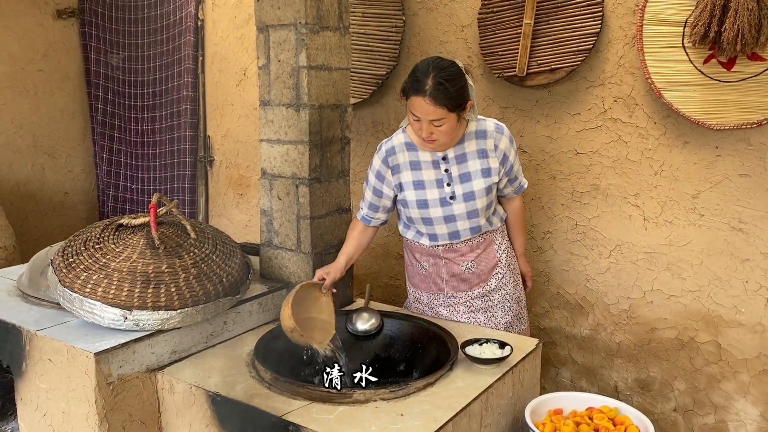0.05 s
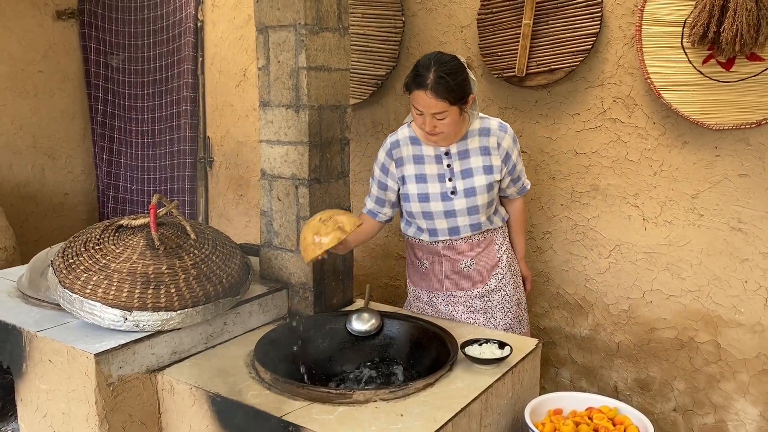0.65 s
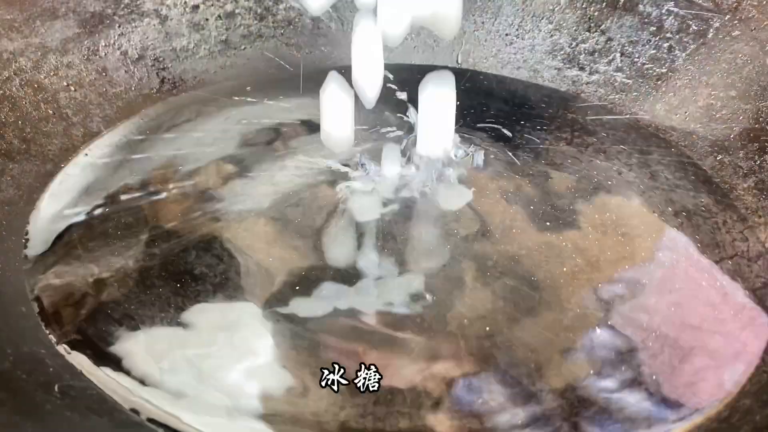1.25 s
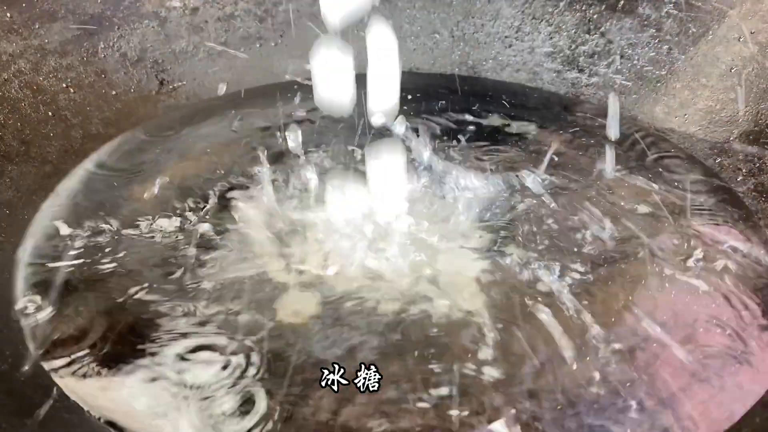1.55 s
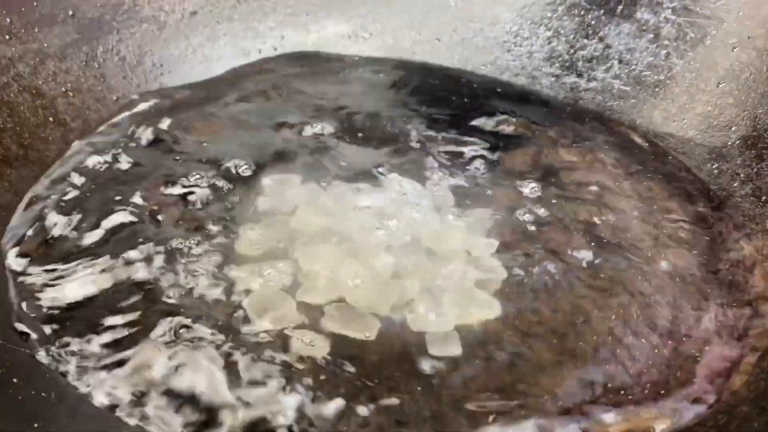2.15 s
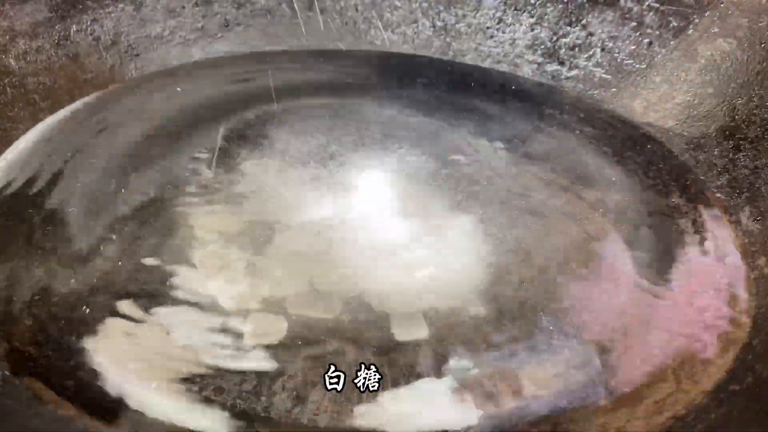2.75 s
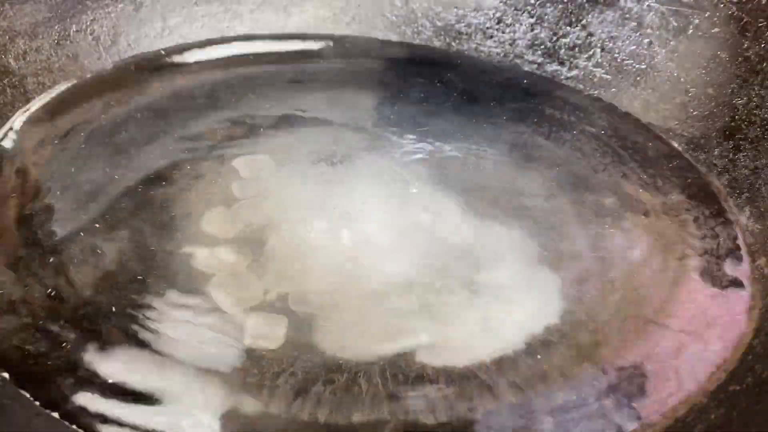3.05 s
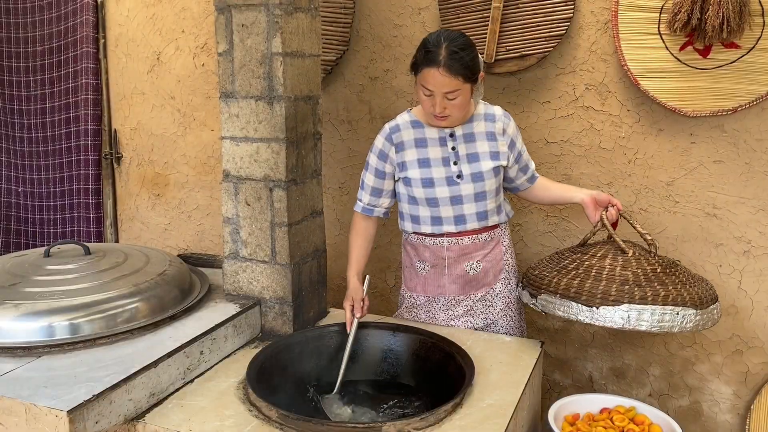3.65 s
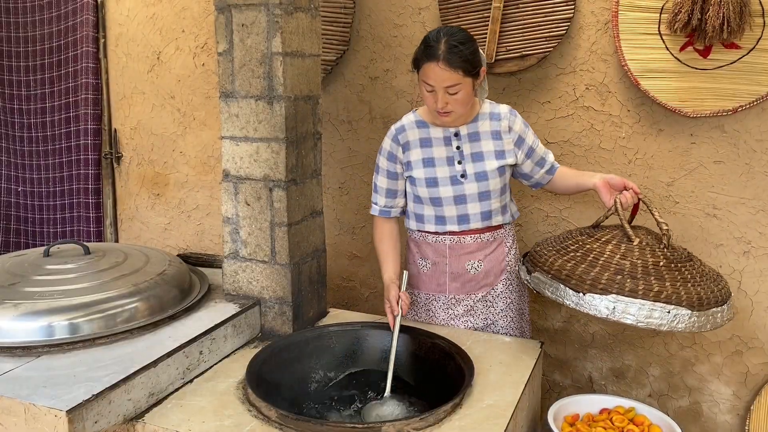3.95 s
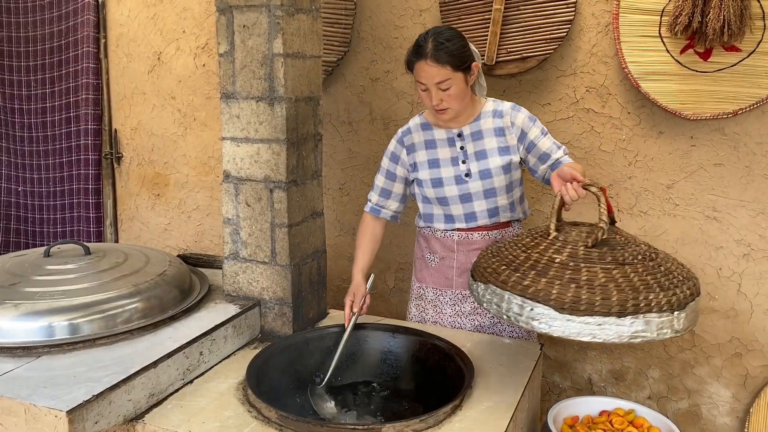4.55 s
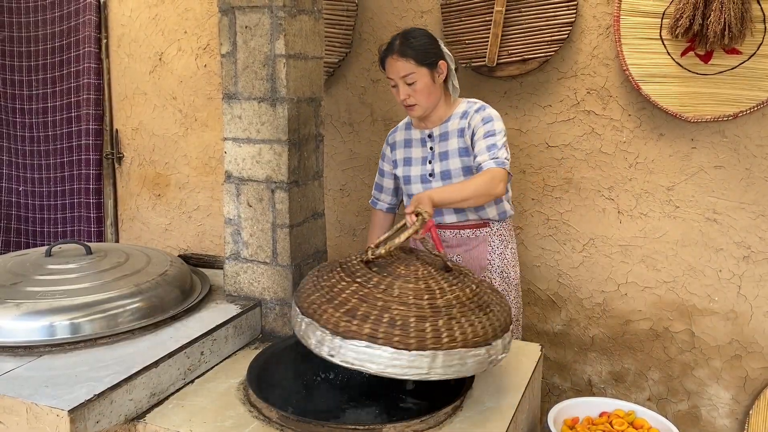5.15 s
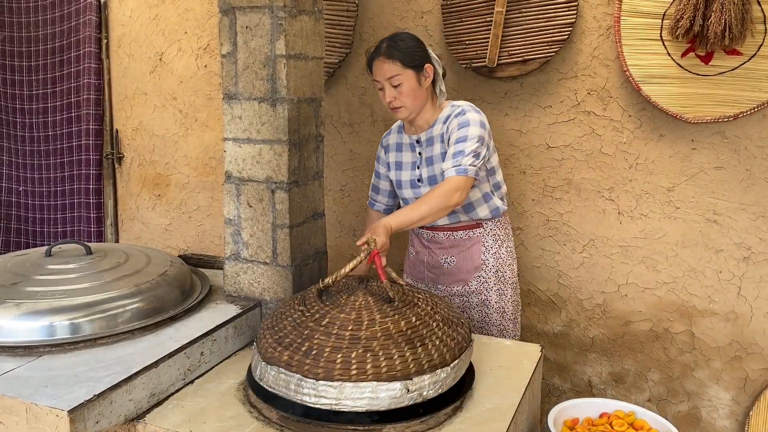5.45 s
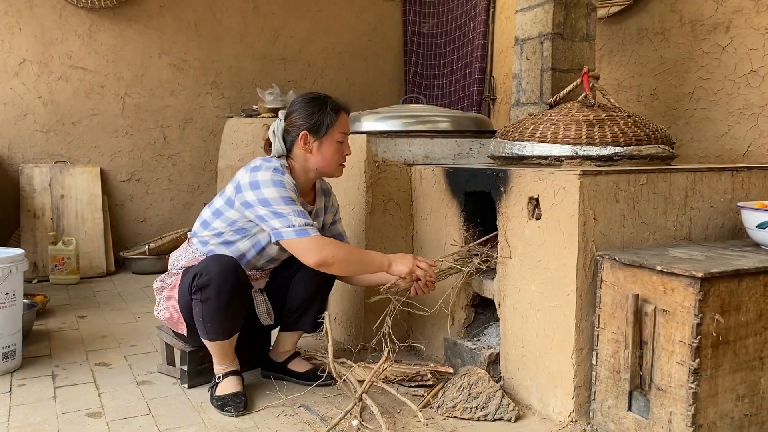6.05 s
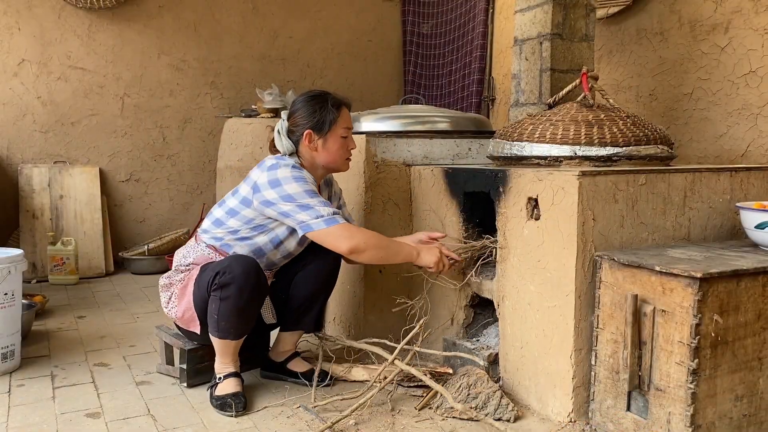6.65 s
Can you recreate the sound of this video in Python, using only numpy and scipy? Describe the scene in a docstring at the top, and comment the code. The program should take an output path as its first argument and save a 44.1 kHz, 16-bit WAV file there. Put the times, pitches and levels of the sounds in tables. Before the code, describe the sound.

Pouring water, a loud splashing clatter of rock sugar in a wok, ladle scrapes and knocks, a lid's clunk and soft twig snaps.

```python
"""Water pours into an iron wok on a clay stove in an open yard, fizzing with ringing bubbles. Lumps of
rock sugar clink out of a bowl, splash in and excite the modes of the iron; fine sugar hisses after them.
Birds call far off. A ladle scrapes, swirls and knocks, and a woven lid lands on the rim. The wok's
sounds stop abruptly, and dry twigs rustle and snap as they are shoved into the rumbling firebox.
Nearby walls reflect every sound, over a faint bed of open air."""
import sys
import numpy as np
from scipy import signal
from scipy.fft import rfft, irfft, next_fast_len
from scipy.io import wavfile
from scipy.ndimage import uniform_filter1d

SR = 44100
rng = np.random.default_rng(int(sys.argv[2]) if len(sys.argv) > 2 else 0)


def dump(signal):
    """Clip the signal to [-1, 1] and save it as 16-bit WAV at the path in sys.argv[1]."""
    limited = np.clip(np.atleast_2d(signal).T, -1, 1)
    pcm = np.round(limited * 32767).astype(np.int16)
    wavfile.write(sys.argv[1], SR, pcm)


N = 303834
T = np.arange(N) / SR


def amp(db):
    """Decibels to amplitude ratio."""
    return 10 ** (np.asarray(db) / 20)


def unit_rms(x):
    """Normalisation to unit power."""
    return x / np.sqrt(np.mean(x ** 2) + 1e-20)


def envelope(rows):
    """Smoothed gain along a level curve, silent outside its span."""
    time_s, level_db = np.transpose(rows)
    return uniform_filter1d(amp(np.interp(T, time_s, level_db, left=-150, right=-150)), size=200)


def swell(start_s, db, attack_s, hold_s, sag_db_per_s, fall_db_per_s):
    """Linear attack with two-stage exponential decay: a sag while held, then a fall."""
    t = T - start_s
    loss_db = sag_db_per_s * np.clip(t, 0, hold_s) + fall_db_per_s * np.maximum(t - hold_s, 0)
    return np.clip(t / attack_s, 0, 1) * amp(np.maximum(db - loss_db, -200))


def drift(rate_hz):
    """Random modulation with a spread of about 1."""
    knots = rng.standard_normal(4000)
    return np.interp(T * rate_hz, np.arange(len(knots)), knots)


def at_hz(points, hz):
    """Interpolation on a log-frequency axis."""
    frequency_hz, value = np.transpose(points)
    return np.interp(np.log(hz + 1), np.log(frequency_hz), value)


def tint(x, spectrum):
    """Zero-phase spectral shaping, rolling off below the first point."""
    size = next_fast_len(len(x))
    hz = np.arange(size // 2 + 1) * SR / size
    gain = amp(at_hz(spectrum, hz)) * np.minimum(hz / spectrum[0][0], 1) ** 2
    return irfft(rfft(x, size) * gain, size)[:len(x)]


def noise(spectrum, samples=N):
    """Filtered Gaussian noise of unit power."""
    return unit_rms(tint(rng.standard_normal(samples), spectrum))


def fade(t, t60):
    """Free decay: 60 dB lost in t60 seconds."""
    return np.exp(-np.log(1000) * t / t60)


def ring(clicks, hz, t60):
    """Damped resonator: each impulse starts a decaying sine."""
    radius, angle = fade(1 / SR, t60), 2 * np.pi * hz / SR
    return signal.lfilter([0, np.sin(angle)], [1, -2 * radius * np.cos(angle), radius ** 2], clicks + 1e-18)


def grains(per_s, spread_db):
    """Shot noise: tiny impacts at random times, uneven in size."""
    sizes = amp(spread_db * np.minimum(rng.exponential(1, N), 4)) * rng.choice([-1, 1], N)
    return unit_rms(sizes * (rng.random(N) < per_s / SR))


def bubble_cloud(spectrum, per_s, spread_db, cycles, patchy_db):
    """Bubble resonance: many small bubbles ring briefly, like sizes coming in clusters."""
    pitches_hz = np.geomspace(350, 15000, 36)
    births = grains(per_s, spread_db)
    birth_hz = pitches_hz[rng.integers(0, len(pitches_hz), N)]
    rings = np.zeros(N)
    for family in np.array_split(pitches_hz, 12):
        cluster = amp(patchy_db * drift(rate_hz=30))
        for hz in family:
            rings += cluster * np.sqrt(hz) * unit_rms(ring(births * (birth_hz == hz), hz, cycles / hz))
    mist = amp(-4.5) * rng.standard_normal(N)   # the finest droplets merge into a hiss
    return unit_rms(tint(unit_rms(rings) + mist, spectrum))


def plops(pockets):
    """Air pockets resonate, rising in pitch as they near the surface."""
    out, t = np.zeros(N), T[:SR // 3]
    for start_s, db, hz, t60, octaves_per_s in pockets:
        start = round(start_s * SR)
        onset = 1 - np.exp(-(t * hz) ** 2)   # builds over about one cycle
        phase = 2 * np.pi * np.cumsum(hz * 2 ** (octaves_per_s * t)) / SR
        out[start:start + len(t)] += amp(db) * onset * fade(t, t60) * np.sin(phase)
    return out


def gurgle(start_s, end_s, low_hz, high_hz, cycles, count):
    """Separate bubbles of equal Q: the small, high ones die sooner."""
    when, smallness, weakness, rise = rng.random((count, 4)).T
    hz = low_hz * (high_hz / low_hz) ** smallness
    return plops(zip(start_s + when * (end_s - start_s), -9 * weakness, hz, cycles / hz, 6 * rise))


# spectrum of the wok's bottom: frequency_hz, level_db
BOOM_SPECTRUM = [(55, -46), (100, -19), (160, -5), (205, 4), (290, -2.5), (370, -16), (480, -32.5),
                 (700, -43.5), (1000, -53.5)]


def judder():
    """Forced vibration of the water-loaded bottom around its lowest mode, at a steady level."""
    slips = grains(per_s=620, spread_db=2)
    lowest_mode = unit_rms(ring(slips, hz=213.5, t60=0.14))
    shake = unit_rms(unit_rms(tint(slips, BOOM_SPECTRUM)) + amp(-2) * lowest_mode)
    return shake / np.sqrt(uniform_filter1d(shake ** 2, size=2500) + 1e-3)


# flow from the scoop: time_s, level_db
POUR_FLOW = [(0.0, -40), (0.108, -43.5), (0.372, -37.5), (0.416, -42.5), (0.46, -37.5), (0.676, -42.5),
             (0.728, -38), (0.844, -54.5), (1.06, -62)]
# the stream straying onto bare iron: start_s, level_db
SPATTERS = [(.45, -52), (0.687, -41.5)]
# spectra of stream and spatter: frequency_hz, level_db
POUR_SPECTRUM = [(350, -7.5), (600, -8.5), (900, -1.5), (2200, -0.5), (4000, -5.5), (7000, -13.5),
                 (11000, -16), (15000, -25)]
SPATTER_SPECTRUM = [(2000, -17.5), (6500, 0.5), (11000, -6.5), (15000, -15.5)]


def pour():
    """Air entrainment: the stream fizzes and gurgles; it also spatters and sets the wok droning."""
    fizz = amp(-1) * bubble_cloud(POUR_SPECTRUM, per_s=9000, spread_db=1.5, cycles=14, patchy_db=5)
    bubbles = amp(1.5) * gurgle(0, 0.79, low_hz=560, high_hz=2840, cycles=44, count=200)
    drone = amp(-22.5) * judder()
    straying = sum(swell(s, db, attack_s=0.0039, hold_s=0.015, sag_db_per_s=63, fall_db_per_s=169)
                   for s, db in SPATTERS)
    spatter = unit_rms(tint(grains(per_s=6100, spread_db=3), SPATTER_SPECTRUM))
    return envelope(POUR_FLOW) * (fizz + bubbles + drone) + straying * spatter


# spectrum of the outdoor background: frequency_hz, level_db
AIR_SPECTRUM = [(25, -12.5), (50, 2), (120, 2), (200, -8.5), (350, -14), (800, -19.5), (1700, -22),
                (4500, -23), (6500, -33.5), (11000, -31), (13000, -41.5), (15000, -45)]


def open_air():
    """Ambient noise: faint, stationary and strongest in the bass."""
    return amp(-57.5) * noise(AIR_SPECTRUM)


# large air pockets and drips: start_s, level_db, pitch_hz, t60_s
AIR_POCKETS = [(.24, -34.5, 1250, 0.067), (.722, -36.5, 1915, 0.23), (.738, -34.5, 700, 0.083),
               (1.26, -12, 1021, 0.17), (1.260, -15, 780, 0.094), (1.265, -13, 600, 0.052),
               (1.300, -12.5, 534, 0.037), (1.339, -22.5, 560, 0.066), (1.342, -22, 1033, 0.22),
               (1.394, -18, 494, 0.064), (2.403, -27, 2730, 0.022), (3.876, -29, 457, 0.11),
               (3.893, -28, 545, 0.09)]


def air_pockets(rise_octaves_per_s=2.5):
    """Single bubble resonances stand out from the water as plops."""
    return plops((*pocket, rise_octaves_per_s) for pocket in AIR_POCKETS)


def impacts(events, spectrum, modes, crack_s, tail_db, tail_s, ring_db, rise_s, ping_db, ping_s):
    """Impulse excitation: a crack, a duller tail, a ping and the body's modes; decay times are t60."""
    out, t = np.zeros(2 * N), T[:SR // 3]
    crack_times = np.broadcast_to(crack_s, len(events))
    for (start_s, peak_db, ping_hz, tilt), crack_t60 in zip(events, crack_times):
        crack = noise([(hz, db + tilt * np.log2(hz)) for hz, db in spectrum], len(t))
        tail = noise([(hz, db - 1.1 * np.log2(hz)) for hz, db in spectrum], len(t))
        hit = crack * fade(t, crack_t60) + amp(tail_db) * tail * fade(t, tail_s)
        hit += amp(ping_db) * np.sin(2 * np.pi * ping_hz * t) * fade(t, ping_s)
        for hz, db, t60 in modes:
            strength = amp(ring_db + db + rng.normal(0, 2))
            hit += strength * np.sin(2 * np.pi * (hz * t + rng.random())) * fade(t, t60)
        hit *= 1 - np.exp(-(t / rise_s) ** 2)
        start = round(start_s * SR)
        out[start:start + len(t)] += amp(peak_db) * hit / np.abs(hit).max()
    return out[:N]


def scrape(spectrum, modes, per_s, spread_db, ring_db):
    """Random excitation: dense slips are heard directly and through the body's modes."""
    slips = grains(per_s, spread_db)
    body = sum(amp(db) * ring(slips, hz, t60) for hz, db, t60 in modes)
    return unit_rms(unit_rms(tint(slips, spectrum)) + amp(ring_db) * unit_rms(body))


# lumps hitting the bowl: start_s, peak_db, ping_hz, tilt_db_per_octave
CLINKS = [(1.0801, -27.5, 2400, -1.5), (1.0932, -21.5, 6020, 0), (1.1129, -22, 2326, 1),
          (1.1355, -10, 10700, 0.9), (1.2286, -11, 4130, -2)]
# modes of the bowl: pitch_hz, level_db, t60_s
BOWL_MODES = [(2400, -12.5, .12), (2640, -14.5, .12), (4040, -10.5, .12), (6070, -7, 0.22), (7650, -5, 0.1),
              (7730, 0, 0.072), (10700, -11, .04)]
# contact spectra of the clinks and the lumps: frequency_hz, level_db
CLINK_SPECTRUM = [(700, -19.5), (2400, 2.5), (6000, 6.5), (9000, 7), (10700, 4), (12500, -4), (16000, -10)]
LUMP_SPECTRUM = [(400, -34.5), (1000, -4), (1600, -3.5), (2600, 6), (3500, -2), (5000, -6), (8000, -11.5),
                 (11000, -16.5), (16000, -31)]
TIP_S, ENTRY_S = 1.08, 1.245   # the bowl tips; the lumps meet the water


def bowl():
    """Impact and friction of sliding lumps excite the modes of the tipped bowl."""
    clinks = impacts(CLINKS, CLINK_SPECTRUM, BOWL_MODES, crack_s=0.0099, tail_db=-19.5, tail_s=0.06,
                     ring_db=-30, rise_s=0.002, ping_db=-2, ping_s=0.016)
    sliding = swell(TIP_S, -39.5, attack_s=0.01, hold_s=ENTRY_S - TIP_S, sag_db_per_s=0, fall_db_per_s=200)
    return clinks + sliding * scrape(LUMP_SPECTRUM, BOWL_MODES, per_s=600, spread_db=1, ring_db=-7)


# larger lumps hitting the wok: start_s, peak_db, ping_hz, tilt_db_per_octave, crack_t60_s
LUMP_HITS = [(1.2463, -8, 3700, 3.6, 0.065), (1.2491, -10.5, 6100, 8, 0.0094), (1.3074, -11, 6100, 9, .025),
             (1.3177, -0.5, 2356, -1, .045), (1.325, -8, 2700, -3, 0.03), (1.3435, -4.5, 4280, 3, .04),
             (1.387, -7, 6440, 2.5, .018), (1.389, -3.5, 2600, -1, 0.046), (1.4179, -11, 2760, 2, .02),
             (1.441, -9, 4200, 2, 0.044), (1.4728, -9.5, 3310, 0.5, 0.016), (1.477, -13, 2800, 0, 0.016),
             (1.511, -5, 2400, -2, .055), (1.517, -13, 2870, -1, 0.021), (1.5753, -7.5, 2720, -1.5, 0.044),
             (1.6045, -21, 3480, -5, 0.0091), (1.6164, -8.5, 5190, 5.5, 0.018),
             (1.668, -15, 2910, 1, 0.011), (1.674, -12.5, 2200, -2.5, 0.12), (1.708, -9, 3570, 1, 0.021),
             (1.729, -18, 3220, 4, 0.014), (1.7384, -9.5, 7060, 1.5, 0.024),
             (1.745, -13.5, 2470, 0.5, .035), (1.7726, -14, 3400, 0.5, 0.019),
             (1.871, -27, 2750, -5, 0.018), (1.894, -29, 2350, -5.5, 0.034), (1.935, -31, 2700, -3, 0.056),
             (1.966, -26, 2400, 0, 0.05), (2.019, -29, 2660, 8.5, 0.037), (2.086, -26.5, 2630, 1, 0.028),
             (2.102, -33, 2300, 0.5, 0.098), (2.1616, -21.5, 2700, 7, 0.044),
             (2.171, -22.5, 2350, -1.5, 0.045), (2.206, -27, 2640, 4.5, 0.05),
             (2.272, -32, 2690, 5.5, 0.065), (2.362, -35, 3690, 12, 0.014), (2.402, -34.5, 3000, -6, .03),
             (2.443, -34, 2400, -6, .03), (2.615, -47.5, 1690, -8, 0.033), (2.649, -45.5, 4130, 13, .06),
             (2.683, -43, 3500, -4, 0.032)]
# heaps landing on the bottom: start_s, peak_db, ping_hz, tilt_db_per_octave
THUDS = [(1.257, -15, 194, 3.5), (1.341, -24, 165, 0.5), (1.41, -28, 130, 1), (1.505, -31, 187, 2.5),
         (1.605, -28, 140, 3), (2.364, -44, 187, -8)]
# modes of the wok holding water: pitch_hz, level_db, t60_s
WOK_MODES = [(1004, -8, 0.08), (1065.7, -2, 0.18), (1225, -7.5, 0.33), (1464, -6.5, 0.2), (1820, -1.5, 0.2),
             (2188, -5, 0.25), (2278, -6, 0.2), (2380, -7.5, 0.18), (2550, -4, 0.18), (2670, -3.5, 0.088),
             (2905, -8, .16), (3140, -11, 0.16), (3690, -15, 0.14), (4110, -11.5, 0.16), (4500, -12, 0.13),
             (4870, -15, 0.12)]
# spectrum of the splash: frequency_hz, level_db
SPLASH_SPECTRUM = [(400, -23), (700, -19), (1050, 0.5), (1500, -10), (2600, -2.5), (4500, -14),
                   (7500, -18.5), (11000, -20), (15000, -28.5)]


def rock_sugar():
    """Impact on water, then iron: lumps throw spray, trap bubbles and make the wok ring and boom."""
    hits = [row[:-1] for row in LUMP_HITS]
    crack_s = [row[-1] for row in LUMP_HITS]
    lumps = impacts(hits, LUMP_SPECTRUM, WOK_MODES, crack_s, tail_db=-17.5, tail_s=0.13,
                    ring_db=-19.5, rise_s=0.00085, ping_db=-2, ping_s=0.026)
    thuds = impacts(THUDS, BOOM_SPECTRUM, [], crack_s=0.09, tail_db=-16, tail_s=0.13,
                    ring_db=0, rise_s=0.0076, ping_db=5.5, ping_s=0.067)
    falling = swell(ENTRY_S, -18, attack_s=0.02, hold_s=0.44, sag_db_per_s=11.5, fall_db_per_s=145)
    settling = swell(ENTRY_S, -49.5, attack_s=0.1, hold_s=1, sag_db_per_s=2.5, fall_db_per_s=59.5)
    clatter = amp(-10.5) * scrape(LUMP_SPECTRUM, WOK_MODES, per_s=800, spread_db=2, ring_db=-1.5)
    spray = amp(-8) * bubble_cloud(SPLASH_SPECTRUM, per_s=7200, spread_db=3, cycles=30, patchy_db=4.5)
    bubbles = amp(0.5) * gurgle(1.25, 1.7, low_hz=657, high_hz=1493, cycles=41, count=30)
    booming = swell(1.256, -34.5, attack_s=0.0043, hold_s=0.56, sag_db_per_s=34, fall_db_per_s=91.5)
    return lumps + thuds + (falling + settling) * (clatter + spray + bubbles) + booming * judder()


# spectrum of sliding sugar grains: frequency_hz, level_db
SUGAR_SPECTRUM = [(3000, -9), (7000, -8), (11000, 3), (15000, -4)]


def fine_sugar(slide_s=2.363, land_s=2.44):
    """Granular flow: sugar hisses off the bowl and patters into the water, a rush and then a trickle."""
    sliding = swell(slide_s, -53.5, attack_s=0.0037, hold_s=0.025, sag_db_per_s=42, fall_db_per_s=119)
    hiss = unit_rms(tint(grains(per_s=9000, spread_db=3), SUGAR_SPECTRUM))
    rush = swell(land_s, -51, attack_s=0.0037, hold_s=0.07, sag_db_per_s=85, fall_db_per_s=350)
    trickle = swell(land_s, -70, attack_s=0.054, hold_s=0.25, sag_db_per_s=6.5, fall_db_per_s=180.5)
    patter = scrape(SPLASH_SPECTRUM, WOK_MODES, per_s=900, spread_db=4.5, ring_db=-5)
    return sliding * hiss + (rush + trickle) * patter


def bird_note(start_s, length_s, db, from_hz, to_hz, rasp_hz):
    """Frequency modulation: a gliding, trembling tone under an arch of level."""
    out, progress = np.zeros(N), np.linspace(0, 1, round(length_s * SR))
    pitch_hz = from_hz + (to_hz - from_hz) * progress + rasp_hz * drift(rate_hz=430)[:len(progress)]
    tone = np.sin(2 * np.pi * np.cumsum(pitch_hz) / SR)
    start = round(start_s * SR)
    out[start:start + len(tone)] = amp(db) * np.sin(np.pi * progress) * tone
    return out


# distant chirps: start_s, length_s, level_db
CHIRPS = [(2.848, 0.044, -58.5), (3.105, 0.07, -55), (5.773, 0.12, -63), (5.897, 0.14, -62)]


def birds():
    """Modulated tones: a short whistle, husky falling chirps and one low coo."""
    whistle = bird_note(2.778, length_s=0.033, db=-63.5, from_hz=2620, to_hz=2620, rasp_hz=22)
    chirps = sum(bird_note(*chirp, from_hz=5300, to_hz=3400, rasp_hz=330) for chirp in CHIRPS)
    coo = bird_note(5.96, length_s=0.23, db=-61.5, from_hz=460, to_hz=460, rasp_hz=3.3)
    return whistle + chirps + coo


# strokes through the water: start_s, level_db
STROKES = [(3.54, -33), (3.6, -51), (3.68, -35.5), (3.76, -33), (3.89, -32.5), (4.09, -43), (4.314, -35),
           (4.461, -36.5), (4.6, -39), (4.771, -60), (4.91, -47), (5.25, -44.5)]
# judder from the ladle's pressure on the bottom: time_s, level_db
LADLE_JUDDER = [(3.27, -53), (3.692, -34), (3.866, -35.5), (3.928, -51), (4.004, -42.5), (4.12, -66),
                (4.57, -49)]
# light ladle touches; dull knocks of ladle and lid: start_s, peak_db, ping_hz, tilt_db_per_octave
TOUCHES = [(3.322, -28.5, 1625, 9), (3.506, -22, 1000, 1.5), (3.555, -23.5, 993, -7.5), (3.6, -23, 2456, 0),
           (3.685, -30.5, 2390, -2), (3.7388, -27, 1240, 3), (3.7762, -27, 2354, -4), (3.836, -29, 1290, 0),
           (3.9025, -24, 2270, 4.5), (3.957, -25.5, 1000, -6), (4.327, -31, 2510, 2),
           (4.3624, -29, 2210, 1), (4.4627, -28.5, 2960, -2), (4.5255, -28, 2250, -6),
           (4.584, -25.5, 1016, -5), (4.6208, -27, 2170, -15), (4.917, -25, 2256, 0), (5.218, -23, 822, -8),
           (5.269, -25.5, 1090, -1)]
KNOCKS = [(4.586, -24.5, 252, -10), (4.624, -27, 187, 10.5), (5.069, -17.5, 229, 1.5),
          (5.104, -36, 213, -1), (5.218, -14.5, 269, 4.5), (5.271, -16, 246, 0.5), (5.302, -23, 170, -4),
          (5.565, -25, 196, 0), (5.595, -24.5, 291, -6)]
# modes of the knocked wok: pitch_hz, level_db, t60_s
KNOCK_MODES = [(180.5, -12, 0.34), (219, 1, 0.066), (289.4, -6.5, 0.097), (324, -28, 0.28),
               (536, -9.5, 0.16), (780, -15, 0.15), (1116, -11, 0.052)]
# spectra of stirring and knocking: frequency_hz, level_db
STIR_SPECTRUM = [(450, -21), (780, -24.5), (1020, -2.5), (1400, -5), (2300, -0.5), (3500, -9), (6000, -20),
                 (10000, -24), (15000, -35)]
KNOCK_SPECTRUM = [(80, -28), (160, 12), (250, 11), (400, 3.5), (700, -4), (1500, -16.5), (4000, -63)]


def ladle():
    """Friction and impact drive the iron, while the stirred water keeps bubbling between strokes."""
    strokes = [swell(s, db, attack_s=0.013, hold_s=0.037, sag_db_per_s=25, fall_db_per_s=68)
               for s, db in STROKES]
    wash = swell(3.268, -42, attack_s=0.0035, hold_s=1.61, sag_db_per_s=0.1, fall_db_per_s=12.5)
    motion = np.sqrt(wash ** 2 + sum(stroke ** 2 for stroke in strokes))   # powers add
    slosh = amp(2 * drift(rate_hz=45))
    drag = amp(-5.5) * scrape(STIR_SPECTRUM, WOK_MODES, per_s=520, spread_db=1.5, ring_db=-5)
    swirl = amp(-6) * bubble_cloud(STIR_SPECTRUM, per_s=3000, spread_db=2, cycles=46, patchy_db=3)
    bubbles = amp(-4) * gurgle(3.4, 4.9, low_hz=480, high_hz=2006, cycles=54, count=60)
    touches = impacts(TOUCHES, STIR_SPECTRUM, WOK_MODES, crack_s=0.035, tail_db=-10, tail_s=0.16,
                      ring_db=-16.5, rise_s=0.001, ping_db=2, ping_s=0.066)
    knocks = impacts(KNOCKS, KNOCK_SPECTRUM, KNOCK_MODES, crack_s=0.11, tail_db=-15, tail_s=0.098,
                     ring_db=1.5, rise_s=0.0034, ping_db=10.5, ping_s=0.049)
    shudder = amp(-1.5) * envelope(LADLE_JUDDER) * judder()
    return motion * (drag + slosh * swirl + bubbles) + shudder + touches + knocks


# lid landing on the rim: start_s, peak_db, ping_hz, tilt_db_per_octave
LID_HITS = [(5.4145, -13.5, 1220, 3.5), (5.433, -23, 2720, 1), (5.4535, -10.5, 1070, 2.5),
            (5.474, -17, 1050, -1), (5.571, -23.5, 1125, -1.5), (5.597, -28.5, 1100, 0)]
# modes of the rim under the lid: pitch_hz, level_db, t60_s
RIM_MODES = [(207, -22, 0.14), (344, -8.5, 0.31), (805, -12, 0.2), (1113, -1.5, 0.25), (1180, -4, 0.25),
             (1710, -6, 0.31), (1990, -17, 0.4), (2203, -3, 0.37), (2735, -16, 0.22), (3074, -6, 0.23),
             (3800, -9, 0.27), (4184, -4.5, 0.28), (5150, -9, 0.13)]
# contact spectrum of the lid: frequency_hz, level_db
LID_SPECTRUM = [(110, -15.5), (210, -1.5), (500, -10), (1070, -2.5), (1450, -8), (2300, -4), (4000, -14.5),
                (7000, -19), (11000, -26.5), (15000, -43)]


def lid():
    """The woven lid excites the rim's modes by impact, then by friction as it slides into its seat."""
    hits = impacts(LID_HITS, LID_SPECTRUM, RIM_MODES, crack_s=0.017, tail_db=-11.5, tail_s=0.17,
                   ring_db=-19, rise_s=0.00098, ping_db=-1, ping_s=0.034)
    sliding = swell(5.409, -29.5, attack_s=0.011, hold_s=0.188, sag_db_per_s=39, fall_db_per_s=500.5)
    return hits + sliding * scrape(LID_SPECTRUM, RIM_MODES, per_s=900, spread_db=0, ring_db=-4.5)


# rustle of the handled twigs: time_s, level_db
TWIG_HANDLING = [(5.66, -68.5), (5.816, -62.5), (6.444, -56.5), (6.566, -53), (6.88, -55)]
# shoves into the firebox: start_s, level_db
SHOVES = [(5.97, -55), (6.16, -54.5), (6.411, -42.5), (6.54, -50.5), (6.68, -47), (6.84, -44.5)]
# twigs breaking: start_s, peak_db, ping_hz, tilt_db_per_octave
SNAPS = [(6.128, -43, 4280, -10), (6.4617, -42, 11000, 3), (6.5235, -33, 10200, 2), (6.6416, -30, 11800, 4)]
# spectra of twigs, firebox and snaps: frequency_hz, level_db
RUSTLE_SPECTRUM = [(400, -6.5), (1000, -6), (2900, -3), (4500, -2.5), (7000, -1), (11000, 2), (15000, -8)]
RUMBLE_SPECTRUM = [(40, -27), (80, -5), (135, 2), (190, -13), (280, -22.5), (600, -40)]
SNAP_SPECTRUM = [(800, -14.5), (3000, 0), (7000, -12), (11000, 6), (16000, -19)]


def twigs():
    """Friction and brittle fracture: dry twigs rustle and snap; each shove makes the firebox rumble."""
    crackle = unit_rms(tint(grains(per_s=4400, spread_db=4), RUSTLE_SPECTRUM))
    rustle = amp(2) * envelope(TWIG_HANDLING) * crackle
    shoving = sum(swell(s, db, attack_s=0.026, hold_s=0.087, sag_db_per_s=17, fall_db_per_s=218)
                  for s, db in SHOVES)
    rumble = shoving * noise(RUMBLE_SPECTRUM)
    snaps = impacts(SNAPS, SNAP_SPECTRUM, [], crack_s=0.015, tail_db=-17, tail_s=0.037,
                    ring_db=0, rise_s=0.00055, ping_db=-1.5, ping_s=0.012)
    return rustle + rumble + snaps


def reflections(x, t60, first_s):
    """Diffuse reflection: convolution with scattered echoes whose treble dies slightly sooner."""
    t = T[:SR // 2]
    scatter = rng.standard_normal(len(t))
    low = signal.sosfilt(signal.butter(1, 4000, fs=SR, output="sos"), scatter)
    echo = (low * fade(t, t60) + (scatter - low) * fade(t, t60 * 0.95)) * (t > first_s)
    return signal.fftconvolve(x, echo / np.sqrt(np.sum(echo ** 2)))[:N]


# reflections that differ between left and right: frequency_hz, side_db
SIDE_SPECTRUM = [(60, -19), (250, -16), (550, -6.5), (1100, -1), (2200, -3), (5000, -1), (7000, -4),
                 (10000, -16.5)]


def yard(x, wet_db, t60, pan_db):
    """Direct sound plus wall echoes, whose decorrelation between left and right gives width."""
    early = reflections(x, t60=0.084, first_s=0.00069)
    mid = x + amp(wet_db) * reflections(x, t60, first_s=0.005)
    late_side = amp(wet_db) * reflections(x, t60, first_s=0.0046)
    side = tint(amp(-3.5) * early + late_side, SIDE_SPECTRUM)
    return np.array([mid + side, mid - side]) * amp(pan_db * np.array([[0.5], [-0.5]]))


def scene(wok_stop_s=5.628):
    """Superposition in the yard: the wok's sounds stop short; twigs, birds and air carry on."""
    pockets = air_pockets()
    sugar = yard(bowl() + rock_sugar() + fine_sugar() + pockets, wet_db=-14, t60=0.25, pan_db=0.8)
    stove = yard(pour() + ladle() + lid(), wet_db=-8.5, t60=0.48, pan_db=-0.54)
    air = open_air()
    far = yard(birds(), wet_db=-0.5, t60=0.3, pan_db=-1)
    near = yard(air + twigs(), wet_db=-9, t60=0.14, pan_db=0.1)
    wok_gate = np.clip((wok_stop_s - T) / 0.001, 0, 1)
    return (sugar + stove) * wok_gate + near + far


# level difference between the channels: frequency_hz, left_minus_right_db
BALANCE = [(100, 0), (700, -1), (1400, -1), (3000, 2), (5200, 2.5), (7000, 0.4), (10000, 0)]
# phase lead of the left channel: frequency_hz, lead_half_turns
LEFT_LEAD = [(300, 0.063), (1100, 0.24), (4500, 0.12), (7000, 0)]


def record(dry, flip_from_hz=7030, flip_every_hz=2040):
    """Interchannel level and phase differences, band-limited; treble bands alternate in polarity."""
    size = next_fast_len(N + 2000)
    hz = np.arange(size // 2 + 1) * SR / size
    channels = rfft(dry, size) * amp(at_hz(BALANCE, hz) * np.array([[0.5], [-0.5]]))
    flips = np.maximum(hz - flip_from_hz, 0) / flip_every_hz
    staircase = flips - np.sin(2 * np.pi * flips) / (2 * np.pi)   # rounded steps of half a turn
    channels[0] *= np.exp(1j * np.pi * (at_hz(LEFT_LEAD, hz) - staircase))
    lowpass = signal.cheby2(16, 70, 16500, fs=SR, output="sos")
    highpass = signal.butter(3, 42, "high", fs=SR, output="sos")
    return signal.sosfilt(np.vstack([highpass, lowpass]), irfft(channels, size)[:, :N])


dry = scene()
out = record(dry)
dump(out)
```